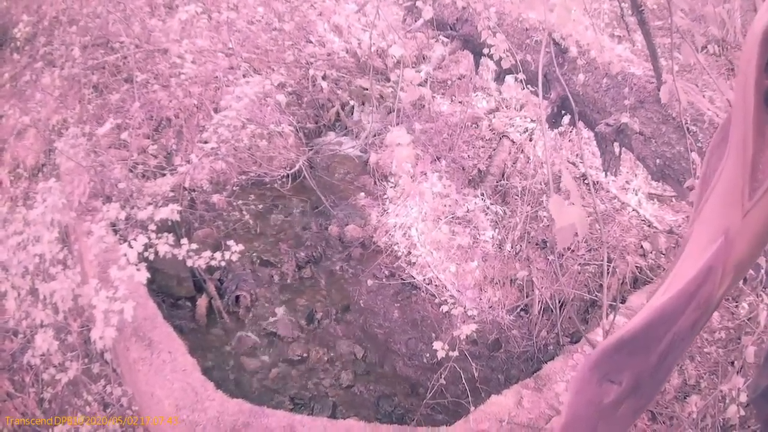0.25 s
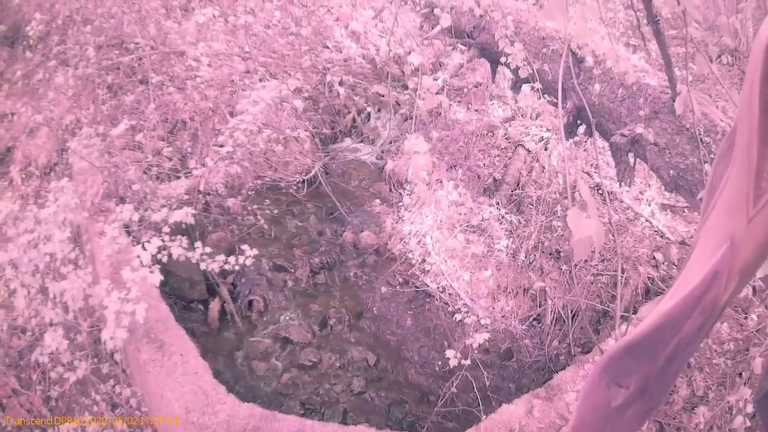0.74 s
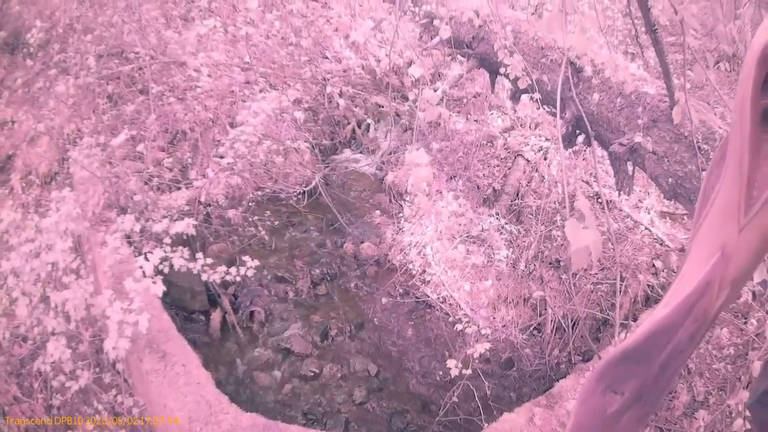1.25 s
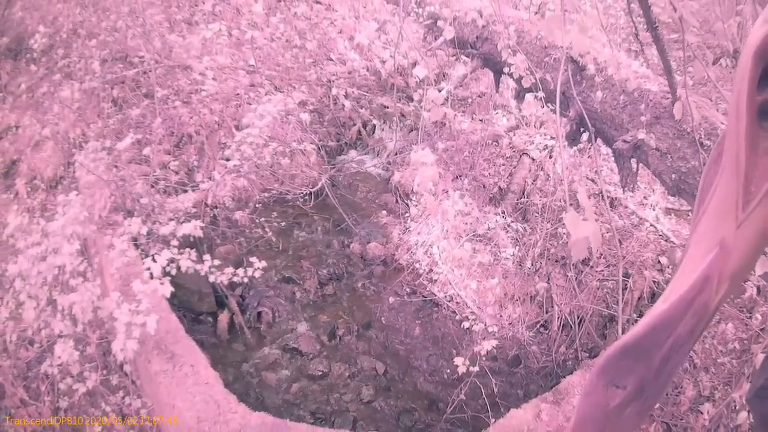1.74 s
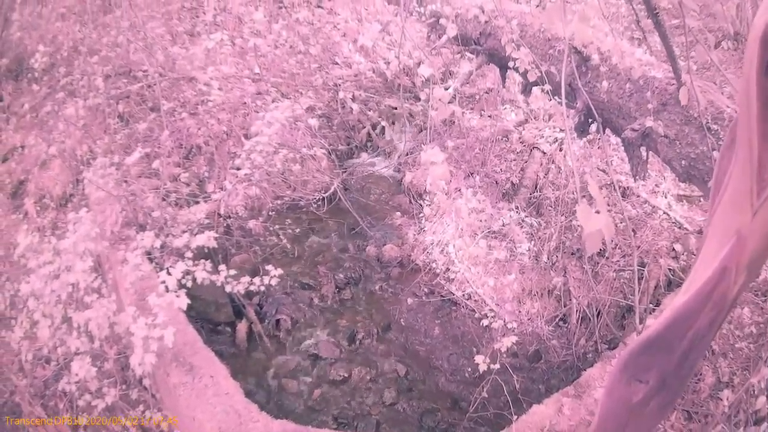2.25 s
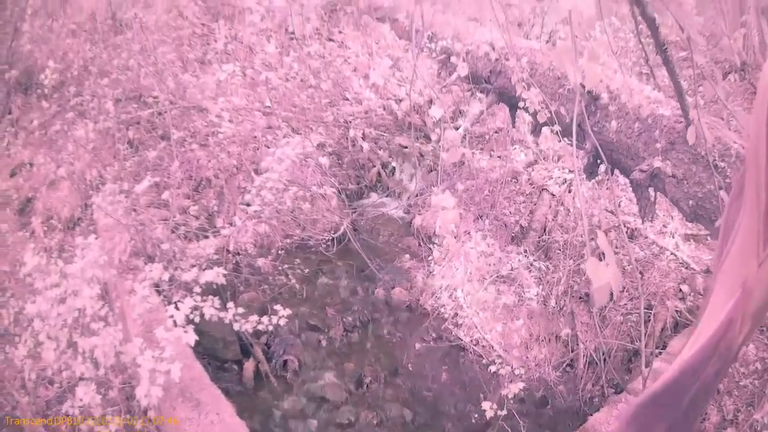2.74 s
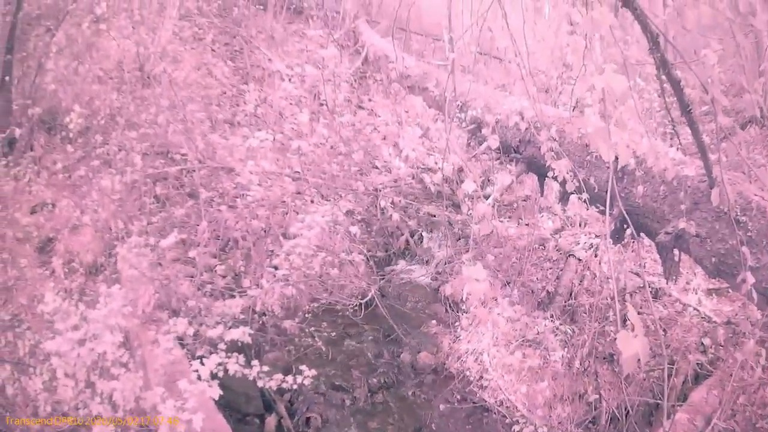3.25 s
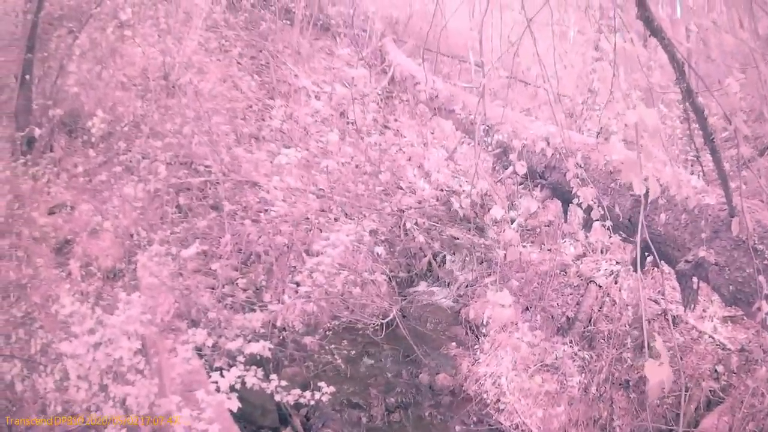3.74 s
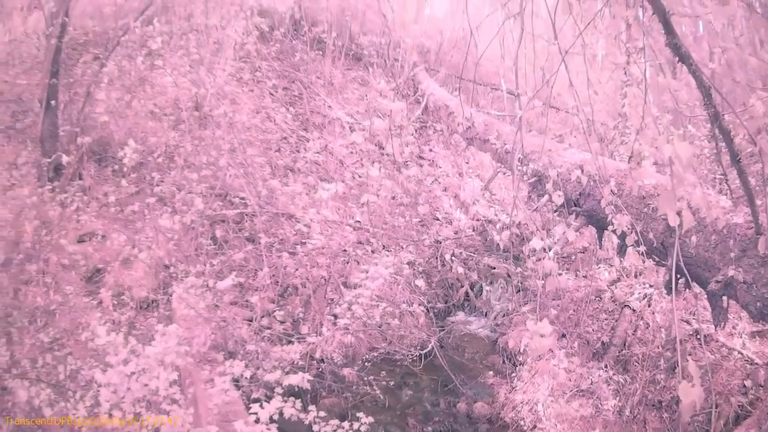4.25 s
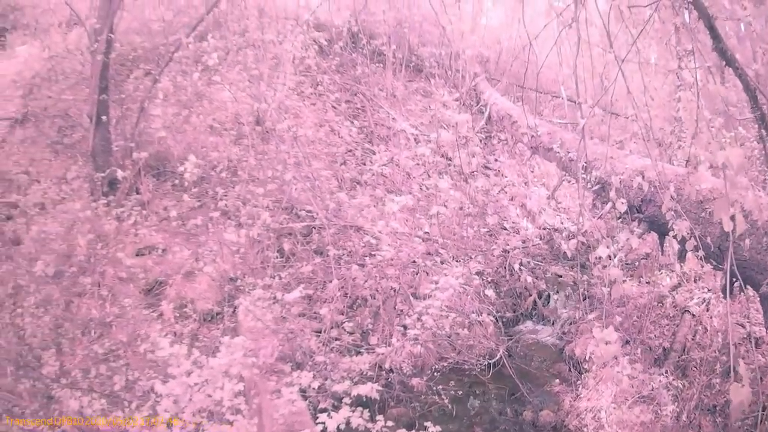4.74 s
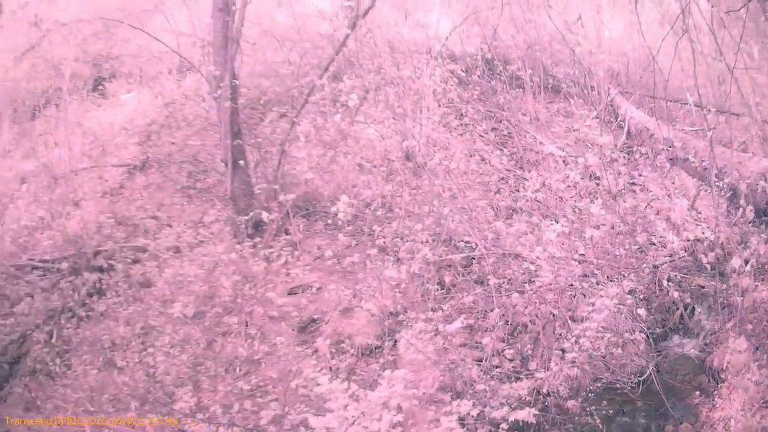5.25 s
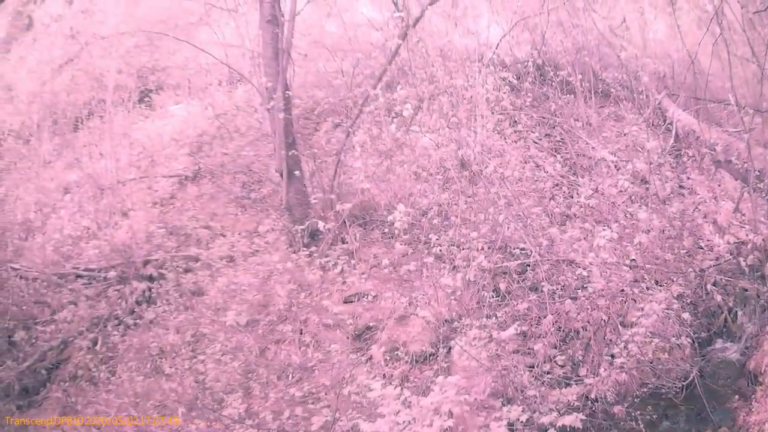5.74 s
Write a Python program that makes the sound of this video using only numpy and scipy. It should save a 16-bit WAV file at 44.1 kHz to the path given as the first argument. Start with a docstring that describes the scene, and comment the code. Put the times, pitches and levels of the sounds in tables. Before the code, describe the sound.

Shallow stream water gurgles and fizzes steadily while a hand-held camera is rubbed and bumped, its sound dipping abruptly near the end.

```python
"""A small creek babbles over rocks in a wood throughout: decaying sine bubbles over shaped noise.
Noise under strokes of gain makes the grip's rub and, until about 3.7 s, puffs of air on the microphone.
Chirped sines make clear bubbles, low swings make jolts and band-passed noise makes sharp ticks.
From 2.5 s the hand-held mono camera swings away from the water, blending two spectra; from 2.8 s
the hand bumps the ringing case, and at 5.49 s the water abruptly sounds quieter, then starts to return."""
import sys
import numpy as np
from scipy import signal
from scipy.fft import rfft, irfft, next_fast_len
from scipy.io import wavfile
from scipy.ndimage import map_coordinates

SR = 44100
rng = np.random.default_rng(int(sys.argv[2]) if len(sys.argv) > 2 else 0)


def put_to_file(sound):
    """Save the sound as 16-bit audio at rate SR, in the file named by the first command-line argument."""
    columns = np.atleast_2d(sound).T  # one column per channel
    safe = np.clip(columns, -1, 1)
    whole_steps = np.round(safe * 32767)
    wavfile.write(sys.argv[1], SR, whole_steps.astype(np.int16))


N = 264585  # samples, 6 s


def amp(db):
    """The decibel law: 20 dB is a tenfold amplitude."""
    return 10 ** (np.asarray(db) / 20)


def unit(x):
    """Normalisation by mean power: scale to rms 1."""
    return x / np.sqrt(np.mean(x ** 2) + 1e-20)


def curves(rows):
    """Linear interpolation: one value per sample for each column after the time."""
    seconds, *columns = np.transpose(rows)
    t = np.arange(N) / SR
    return [np.interp(t, seconds, column) for column in columns]


def wobble(rate):
    """Slow random modulation: a smooth spline through rate random knots a second."""
    knots = rng.standard_normal(int(N * rate / SR) + 4)
    return map_coordinates(knots, [np.arange(N) * rate / SR])


def filtered(x, response):
    """Linear filtering: multiply the spectrum of x by a response of frequency."""
    m = next_fast_len(N + SR // 2)
    hz = np.fft.rfftfreq(m, 1 / SR)
    return irfft(rfft(x, m) * response(hz), m)[:N]


def coloured(x, spectrum):
    """Spectral shaping: filter x through (Hz, dB) points on a log axis, at rms 1."""
    f, db = np.transpose(spectrum)

    def response(hz):
        return amp(np.interp(np.log(hz + 1), np.log(f + 1), db))

    return unit(filtered(x, response))


def add(track, s, sound):
    """Superposition: mix a sound into the track at time s in seconds."""
    part = track[max(round(s * SR), 0):][:len(sound)]
    part += sound[:len(part)]


def strokes(rows, attack, release, rest_db):
    """Amplitude envelope: (start, length, dB) strokes swell, hold and fade over a resting level."""
    t = np.arange(N) / SR
    swells = []
    for s, length, db in rows:
        swell = (t - s) / attack
        fade = 1 - (t - s - length) / release
        swells.append(amp(db) * np.clip(np.minimum(swell, fade), 0, 1))
    return np.maximum(amp(rest_db), np.max(swells, axis=0))


# How far the camera points away from the pool. Each row: time in seconds, share from 0 to 1.
CAMERA_TURN = [(0, 0.21), (2.5, 0.08), (3.3, 0.38), (4.6, .7), (5.2, 0.93), (6, 0.86)]


def turned():
    """Orientation to the source: the camera's swing away from the pool, 0-1."""
    return np.clip(curves(CAMERA_TURN)[0], 0, 1)


# steady level of the water at the camera, and what it would lose with the camera fully away
WATER_DB, AWAY_LOSS_DB = -36, 1.5
# the abrupt drop; the hold counts from its start
DIP_START_S, DIP_FALL_S, DIP_DB = 5.49, 0.085, 7
DIP_HOLD_S, RECOVER_DB_PER_S = 0.35, 26


def water_gain():
    """Attenuation adds in dB: a small loss with the turn, then an abrupt dip that starts to recover."""
    since = np.arange(N) / SR - DIP_START_S
    fall_db = DIP_DB * np.clip(since / DIP_FALL_S, 0, 1) ** 2
    recovery_db = RECOVER_DB_PER_S * np.maximum(since - DIP_HOLD_S, 0)
    dip_db = np.maximum(fall_db - recovery_db, 0)
    return amp(WATER_DB - AWAY_LOSS_DB * turned() ** 3 - dip_db)


def bubble(age, cycles, rise):
    """Damped resonance: a bubble rings and sharpens as it nears the surface; age counts its periods."""
    life = age / cycles
    onset = 1 - np.exp(-2 * age)
    return np.sin(2 * np.pi * age * (1 + rise * life / 2)) * np.exp(-life) * onset


def swarm(lo_hz, hi_hz, cycles, rise, spread_db, count):
    """Incoherent sum: random bubbles of a band, as strong per Hz as white noise of rms 1."""
    when, pitch, chance = rng.random((count, 3)).T
    hz = lo_hz * (hi_hz / lo_hz) ** pitch
    size = hz * amp(-spread_db * np.log(chance + 1 / 50))  # a few bubbles are much stronger
    # samples per bubble, capped to bound the memory
    k = np.arange(min(int(2 * 2 * cycles * SR / lo_hz), 5000000 // count))
    rings = size[:, None] * bubble(hz[:, None] * k / SR, cycles, rise)
    places = (when * N).astype(int)[:, None] + k
    track = np.bincount(places.ravel(), rings.ravel())[:N]
    return unit(track) * np.sqrt(abs(hi_hz - lo_hz) / (SR / 2))


# The water heard from the front. Each row: frequency in Hz, relative response in dB.
FRONT_SPECTRUM = [(100, -61), (170, -16), (234, -9), (329, -3.5), (376, -3.5), (413, -3), (614, -7),
                  (800, -2), (1460, -8.5), (2180, -2.5), (4290, -7), (7850, -5.5), (9670, 0), (13800, -14),
                  (15500, -20.5)]
# The water heard from the side. Each row: frequency in Hz, relative response in dB.
SIDE_SPECTRUM = [(150, -5), (380, -3.5), (800, -2.5), (1050, -4), (1350, -2), (1750, -9), (2150, -6),
                 (3100, -5.5), (4300, -3), (6300, -5.5), (9600, -1.5), (10600, -2), (12600, -13.5),
                 (15700, -20)]


def creek():
    """Bubble acoustics: large, small and tiny bubbles ring over the wash of countless faint ones."""
    gurgles = swarm(279.84, 1293.0, cycles=9.16, rise=0.053, spread_db=2.5, count=1100)
    babble = swarm(1123.0, 5436.6, cycles=5.3, rise=0.014, spread_db=3.0, count=4500)
    spray = swarm(5280, 14450, cycles=2.4, rise=0.0173, spread_db=3.0, count=9000)
    wash = rng.standard_normal(N)
    # the spray comes in quick spurts on slower surges
    spurts = amp(1.0 * wobble(11) + 2.197 * wobble(30) + 1.8 * wobble(110))
    water = amp(-2) * gurgles + amp(-3.5) * babble + amp(-2.0) * spray * spurts + amp(0.5) * wash
    turn = turned()
    front = (1 - turn) * coloured(water, FRONT_SPECTRUM)
    side = turn * coloured(water, SIDE_SPECTRUM)
    return water_gain() * (front + side)


# Colour of the rubbing grip. Each row: frequency in Hz, relative response in dB.
RUB_SPECTRUM = [(30, 3.5), (80, -2), (190, 0.5), (300, -4), (480, -6.5), (720, -7.5), (1000, -17.5),
                (1330, -7), (1750, -15), (5000, -35)]
# Slides of the grip on the case. Each row: start in seconds, length in seconds, rms level in dB.
RUB_STROKES = [(1.88, 0.44, -50), (2.74, 0.13, -40.5), (3.05, 0.2, -44.5), (4.1, 0.48, -45.5),
               (4.62, 0.48, -51), (5.25, 1, -49)]


def grip_rub():
    """Stick-slip friction: the grip rubs the case in uneven slips over a faint resting rub."""
    slips = unit(rng.standard_normal(N) * amp(2.95 * wobble(45)))
    gain = strokes(RUB_STROKES, attack=0.05, release=0.16, rest_db=-56)  # seconds, seconds, dB
    return gain * coloured(slips, RUB_SPECTRUM)


# Colour of the buffeting air. Each row: frequency in Hz, relative response in dB.
AIR_SPECTRUM = [(3, -26), (10, -1), (20, -13), (35, -23.5), (70, -34.5), (160, -70), (500, -90)]
# Puffs of air. Each row: start in seconds, length in seconds, rms level in dB.
AIR_PUFFS = [(.12, 0.3, -41.5), (1.17, 0.41, -35), (1.82, 0.53, -40.5), (2.38, 0.39, -37.5),
             (3.36, 0.086, -41)]


def air_puffs():
    """Turbulent pressure: slow puffs of air press on the microphone over a calmer stir."""
    gain = strokes(AIR_PUFFS, attack=0.054, release=0.22, rest_db=-50)  # seconds, seconds, dB
    return gain * coloured(rng.standard_normal(N), AIR_SPECTRUM)


# Single bubbles that stand out. Each row: start in seconds, nominal level in dB, starting pitch in Hz.
CLEAR_BUBBLES = [(.134, -23, 8400), (.375, -24.5, 5130), (.867, -30, 1750), (.869, -31, 2051),
                 (1.342, -30, 2880), (2.08, -24, 7700), (2.632, -21, 6540), (2.874, -32, 2300),
                 (3.153, -34, 1380), (3.719, -27, 3817), (5.942, -22, 8100)]


def plinks():
    """Damped resonance: single bubbles close by ring out above the rest."""
    track, t = np.zeros(N), np.arange(SR // 20) / SR
    for s, db, hz in CLEAR_BUBBLES:
        add(track, s, amp(db) * bubble(hz * t, cycles=6.2, rise=0.015))
    return track


# Soft low jolts as the camera is moved. Each row: start in seconds, nominal level in dB, frequency in Hz.
ARM_JOLTS = [(.29, -36, 23), (.925, -30.5, 22), (1.965, -39, 60), (2.081, -33.5, 56), (2.214, -37.5, 64),
             (2.799, -24.5, 8.6), (4.085, -35, 21), (4.70, -38, 28), (5.43, -40, 40), (5.94, -35, 24)]


def jolts():
    """Damped oscillation: a jolt of the arm rocks the microphone for a cycle or two."""
    track, t = np.zeros(N), np.arange(SR // 2) / SR
    for s, db, hz in ARM_JOLTS:
        swing = hz * t / 0.35  # the envelope peaks after 0.35 cycle
        envelope = swing * np.exp(1 - swing)
        add(track, s, -amp(db) * envelope * np.sin(2 * np.pi * hz * t))
    return track


# fainter random ticks: nominal level over the water's gain, pitch, scatter of each, ring time
FAINT_TICK_DB, FAINT_SCATTER_DB = 14.5, 1.5
FAINT_TICK_HZ, FAINT_SCATTER_OCTAVES, FAINT_T60_S = 9100, 0.1, 0.0054


def faint_ticks(count):
    """Random arrivals: rows of small ticks at uniform times that follow the water's level."""
    gain, rows = water_gain(), []
    for when, size, pitch in rng.random((count, 3)):
        water_db = 20 * np.log10(gain[int(when * N)])
        db = water_db + FAINT_TICK_DB + FAINT_SCATTER_DB * (2 * size - 1)
        hz = FAINT_TICK_HZ * 2 ** (FAINT_SCATTER_OCTAVES * (2 * pitch - 1))
        rows.append((when * N / SR, db, hz, FAINT_T60_S))
    return rows


# The loudest ticks of droplets and dry litter. Each row: start in seconds, nominal level in dB
# (the snap peaks 4 dB lower), centre frequency in Hz, 60 dB decay time in seconds.
LOUD_TICKS = [(.415, -16, 9500, .008), (.698, -20.5, 10700, .026), (.744, -20, 9700, 0.035),
              (1.163, -19, 9700, .015), (1.71, -9.5, 8500, 0.0061), (2.130, -13, 9400, .004),
              (2.7965, -18, 10500, .01), (2.882, -20, 10000, .008), (3.2272, -15.5, 10100, .016),
              (3.450, -19, 9500, .031), (3.9325, -15, 8360, 0.0086), (4.414, -17.5, 7800, 0.0097),
              (5.064, -21, 9000, .008), (5.4833, -19, 9300, .004), (5.844, -24, 9000, 0.019)]


def ticks():
    """Impulsive excitation: each tick is a bright snap with a faint scatter from the banks."""
    track, t = np.zeros(N), np.arange(SR // 20) / SR
    for s, db, hz, t60 in LOUD_TICKS + faint_ticks(count=14):
        edges = [hz * 0.78, min(hz * 1.2, SR / 2 - 1)]
        band = signal.butter(3, edges, "bandpass", fs=SR, output="sos")
        scatter = amp(-13 - 60 * t / 0.045)
        fade = amp(-60 * t / t60) + scatter
        snap = signal.sosfilt(band, fade * rng.standard_normal(len(t)))
        add(track, s, amp(db - 4.0) * snap / np.abs(snap).max())
    return track


# Modes of the plastic case. Each row: frequency in Hz, mean relative level in dB,
# 60 dB decay time in seconds.
CASE_MODES = [(271, -9.5, 0.048), (745, -9, 0.032), (1391, -7, 0.066), (1670, -7, 0.0076),
              (1800, -1, 0.015), (2070, 1.5, 0.022), (2040, -27, 0.038), (2920, -21, .01),
              (4160, -41, .006)]
# Bumps of the hand on the case. Each row: start in seconds, nominal level in dB,
# push of the palm in relative dB, low-pass cutoff in Hz.
HAND_BUMPS = [(2.7968, -20.5, 8, 5000), (2.7983, -17, -12, 5500), (2.808, -17.5, -22, 2000),
              (3.16, -23.5, -20, 1480), (4.294, -25, -8, 1100), (4.915, -18.5, -16, 1280),
              (4.983, -23, -25, 1200)]


def bumps():
    """Modal excitation: the hand bumps the case, a short ring and a scuff on top of a soft low push."""
    track, t = np.zeros(N), np.arange(SR // 4) / SR
    for s, db, push_db, bright_hz in HAND_BUMPS:
        ring = np.zeros(len(t))
        for hz, level, t60 in CASE_MODES:
            decay = amp(level + rng.normal(0, 0.82) - 60 * t / t60)
            ring += decay * np.sin(2 * np.pi * (hz * t + rng.random()))
        scuff = amp(-3.5 - 60 * t / 0.064) * rng.standard_normal(len(t))
        # soft skin damps the upper modes
        skin = signal.butter(3, bright_hz, fs=SR, output="sos")
        contact = signal.sosfilt(skin, ring + scuff)
        # the palm presses and lets go within a few milliseconds
        push = np.sin(np.pi * np.minimum(t / 0.0038, 1)) ** 2
        add(track, s, amp(db) * (0.47 * contact + amp(push_db) * 0.92 * push))
    return track


def scene():
    """Superposition at one microphone, which feeds both channels."""
    mono = creek() + grip_rub() + air_puffs() + plinks() + jolts() + ticks() + bumps()
    return np.array([mono, mono])


TOP_HZ = 15800


def record(dry):
    """Band limitation: the camera keeps nothing from TOP_HZ up."""
    return np.array([filtered(channel, lambda hz: hz < TOP_HZ) for channel in dry])


dry = scene()
out = record(dry)
put_to_file(out)
```